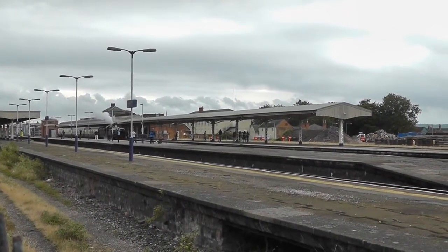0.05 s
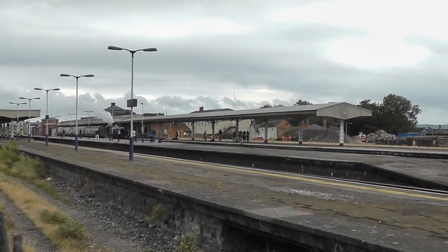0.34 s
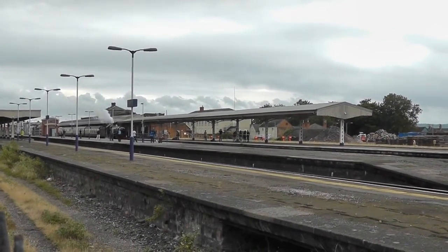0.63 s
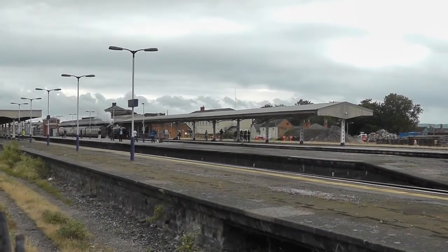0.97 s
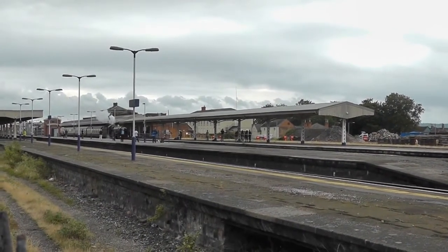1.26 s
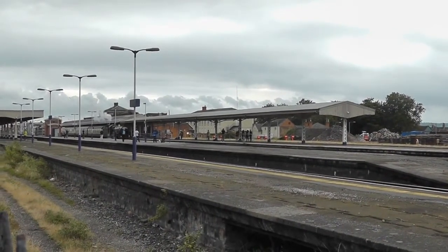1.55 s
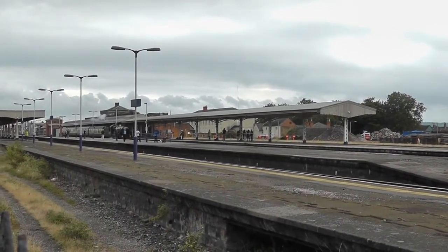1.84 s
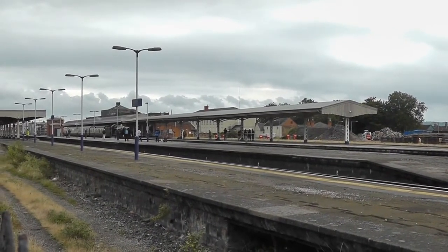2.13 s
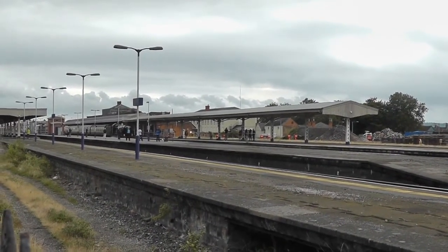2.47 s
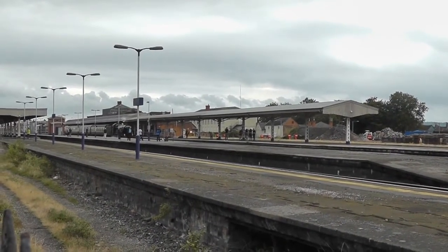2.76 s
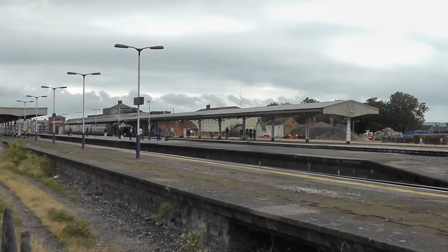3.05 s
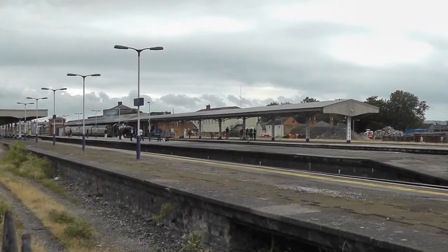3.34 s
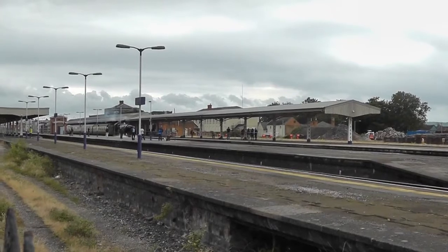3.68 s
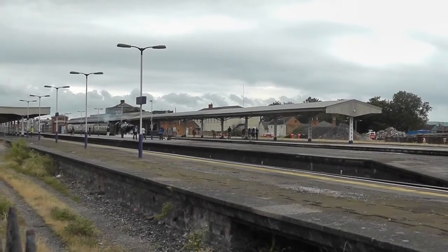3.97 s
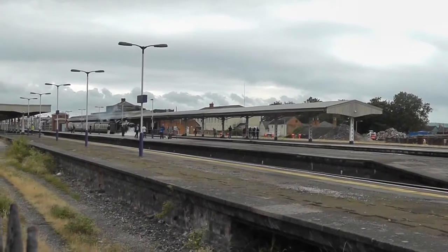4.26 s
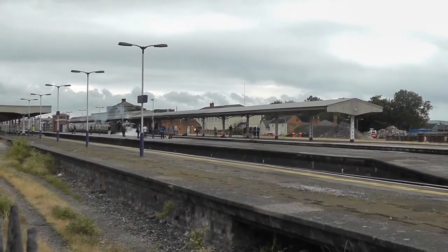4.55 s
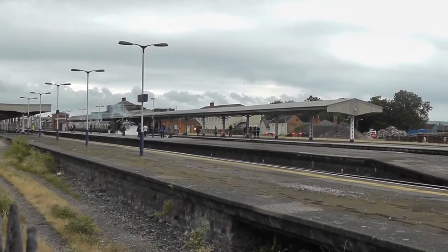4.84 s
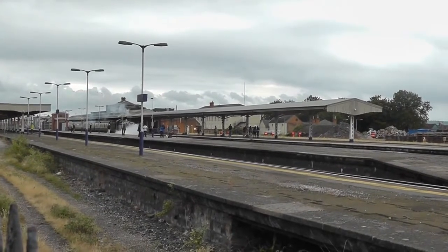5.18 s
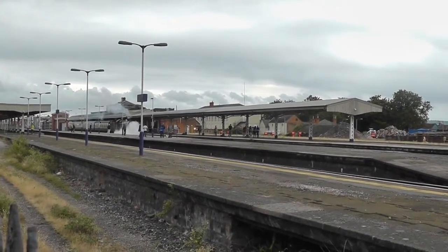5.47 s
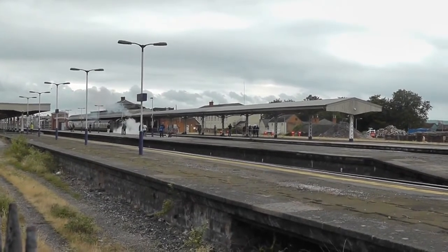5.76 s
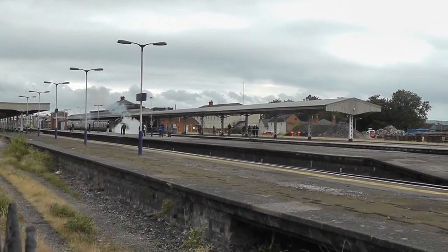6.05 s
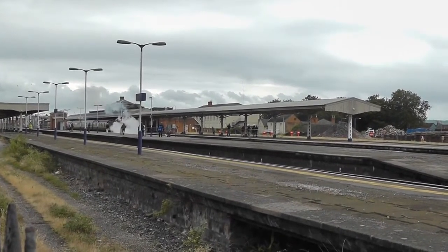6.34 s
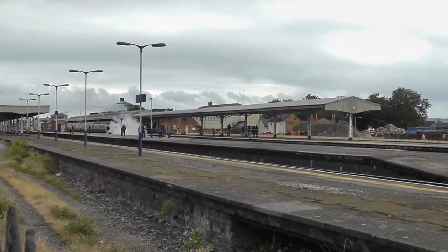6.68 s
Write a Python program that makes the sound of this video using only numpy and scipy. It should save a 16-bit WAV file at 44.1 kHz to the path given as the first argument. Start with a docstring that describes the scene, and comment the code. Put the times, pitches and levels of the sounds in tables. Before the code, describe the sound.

Heard from an open railway platform, a distant steam whistle holds one slightly raspy note, breaks off and adds a quick toot, leaving a long echo. Low wind rumble rises on the microphone, with a few hard knocks around the middle. Meanwhile the locomotive starts to vent steam, a faint leak at first, then a bright hiss that grows in swells above the engine's soft, dull roar.

```python
"""A steam locomotive's whistle, heard from far down a station platform: a long blast, a short toot.
A steam jet drives the pipe, which scoops up to its note and turns brighter when overblown.
The buildings ring on and distant walls answer; then the cylinder drains open in a growing hiss
over a dull roar. Wind buffets the microphone of a small camera, whose limiter ducks under the
strongest gusts."""
import sys
import numpy as np
from scipy import signal
from scipy.fft import rfft, irfft, next_fast_len
from scipy.io import wavfile
from scipy.ndimage import uniform_filter1d

SR = 44100
rng = np.random.default_rng(int(sys.argv[2]) if len(sys.argv) > 2 else 0)


def pcm_store(signal):
    """Save signal as 16-bit PCM."""
    levels = np.round(np.clip(np.atleast_2d(signal), -1, 1) * 32767)
    wavfile.write(sys.argv[1], SR, levels.astype(np.int16).T)


N = 300321
LEAD = 3 * SR // 2  # the whistle is already sounding when the scene begins
T = np.arange(-LEAD, N) / SR
NOTE_HZ = 884
MID_BAND_HZ = (1000, 1600)  # sets the level of roar and rush

# pulls of the whistle cord: valve opens t/s, valve shut t/s
PULLS = [(-1.5, 1.372), (1.524, 1.719)]


def amp(db):
    """Decibels to gain."""
    return 10 ** (np.asarray(db) / 20)


def unit(x):
    """Scales to rms 1."""
    return x / np.sqrt(np.mean(x ** 2) + 1e-20)


def follow(rows):
    """The columns of a time curve, one value a sample."""
    times, *columns = np.transpose(rows)
    return [np.interp(T, times, column) for column in columns]


def at_hz(rows, hz, column=1):
    """One column of a spectrum at the given frequencies."""
    table = np.transpose(rows)
    return np.interp(np.log(hz + 1), np.log(table[0] + 1), table[column])


def swells(rows):
    """Bell-shaped rises and dips in dB, one for each row."""
    return sum(db * np.exp(-((T - s) / half_s) ** 2) for s, half_s, db in rows)


def wobble(rate_hz):
    """Smooth random motion of rms 1, mostly slower than the given rate."""
    size = next_fast_len(len(T))
    hz = np.fft.rfftfreq(size, 1 / SR)
    spectrum = rfft(rng.standard_normal(size)) / (1 + (hz / rate_hz) ** 2)
    return unit(irfft(spectrum, size)[:len(T)])


def noise(spectrum, band_hz, patchy_db):
    """Coloured noise with drifting patches, rms about 1 inside the band."""
    hz = np.fft.rfftfreq(2048, 1 / SR)
    real, imag, patches = rng.standard_normal((3, len(T) // 512 + 3, len(hz)))
    patches = unit(uniform_filter1d(uniform_filter1d(patches, size=9, axis=0), size=30, axis=1))
    colour = amp(at_hz(spectrum, hz))
    band_share = np.sum(colour[(hz > band_hz[0]) & (hz < band_hz[1])] ** 2) / np.sum(colour ** 2)
    frames = (real + 1j * imag) * colour * amp(patchy_db * patches)
    sound = signal.istft(frames.T, nperseg=2048, noverlap=1536)[1][:len(T)]
    return unit(sound) / np.sqrt(band_share)


def resonate(x, hz, width_hz):
    """A resonance of gain 1 that follows the curve hz."""
    turn = np.exp(2j * np.pi * np.cumsum(hz) / SR)
    pole = np.exp(-np.pi * width_hz / SR)
    return 2 * (turn * signal.lfilter([1 - pole], [1, -pole], x / turn)).real


def roar():
    """The dull roar of the distant engine: the low body of its steam, blurred by the yard."""
    # colour of the roar: f/Hz, level/dB
    colour = [(150, -17), (350, -3.5), (550, 1.5), (850, -4), (1150, 5), (1600, 2), (2300, -0.5),
              (4000, -31.5), (12000, -62)]
    # its slow rise: t/s, level/dB
    rise = [(1.78, -49), (2.25, -44), (3.05, -37.5), (3.3, -44.5), (3.95, -40), (4.3, -39), (5.1, -39),
            (6.1, -33), (6.81, -32.5)]
    return amp(follow(rise)[0]) * noise(colour, MID_BAND_HZ, patchy_db=1.4)


def wind(eddy_db=-3, lumpy_db=3, unsteady_db=3.0, eddy_share=0.59):
    """Slow pressure swings on the microphone, with lumps of smaller eddies; gusts lift both."""
    # colours of the slow swings and the fast eddies: f/Hz, level/dB
    swing_colour = [(10, -33.5), (20, -0.5), (43, 0), (79, -1.5), (115, -14.5), (200, -30), (420, -41),
                    (900, -75.5)]
    eddy_colour = [(50, -27), (110, 4.5), (160, -1), (250, -12), (400, -25), (800, -34), (2000, -59.5),
                   (8000, -100)]
    # breeze along the platform: t/s, swing level/dB, eddy level/dB
    breeze = [(0, -31, -49), (.45, -39.5, -48.5), (1.1, -33.5, -43), (1.38, -20, -32.5), (1.68, -41, -53),
              (1.85, -28, -39.5), (2.3, -15.5, -30), (3.1, -7.5, -22), (3.7, -10, -22.5), (5.0, -12, -22.5),
              (6.0, -22.5, -30), (6.45, -20, -32), (6.81, -7, -32)]
    # gusts and lulls on top of it: middle t/s, half length/s, change/dB
    gusts = [(2.39, 0.028, 7.5), (2.75, 0.037, 5), (2.9, 0.068, -12.5), (3.12, 0.02, 0), (3.58, 0.15, 4.5),
             (5.75, 0.3, 3), (6.25, 0.087, 11)]
    swing_level, eddy_level = follow(breeze)
    gust_db = swells(gusts) + unsteady_db * wobble(1.3)
    swings = noise(swing_colour, band_hz=(20, 130), patchy_db=2.5)
    swings /= np.sqrt(uniform_filter1d(swings ** 2, size=6000))  # breeze and gusts set the strength
    eddies = noise(eddy_colour, band_hz=(130, 350), patchy_db=1.5) * unit(amp(lumpy_db * wobble(16.0)))
    return amp(swing_level + gust_db) * swings + amp(eddy_level + eddy_share * gust_db + eddy_db) * eddies


def buffets(swing_s=0.0037):
    """Hard knocks of wind on the microphone, each a rounded push of pressure and a pull back."""
    # single buffets: t/s, peak level/dB
    knocks = [(3.09, 0), (3.237, -.5), (3.407, .5), (3.706, 3.5), (4.129, 4)]
    pressure = np.zeros(len(T))
    for s, db in knocks:
        offset = (T - s) / swing_s
        swing = -offset * np.exp(-offset ** 2)
        pressure += amp(db) * swing / swing.max()
    return pressure


def cylinder_drains(hiss_db=-1, fizz_db=-1.5, split_hz=4900, jet_width_hz=560, fizz_share=0.58):
    """Steam escapes in a sputtering hiss, a fine fizz above it, and a broad moving resonance."""
    # colour of the escaping steam: f/Hz, level/dB
    colour = [(500, -16.5), (900, -17), (1170, -23.5), (1430, -15), (1650, -6), (1900, -8.5), (2800, -2.5),
              (3600, 0), (5000, -11), (6600, -11.5), (9200, -18), (12100, -30), (15400, -50.5)]
    # a leak, then the drains open and the flow builds: t/s, hiss level/dB, fizz level/dB
    flow = [(1.75, -41.5, -50.5), (2.65, -41.5, -43), (3.73, -37, -44), (3.79, -31.5, -36), (4.3, -26, -37),
            (5.15, -26, -36), (5.9, -23, -32), (6.6, -20.5, -30), (6.81, -24, -35)]
    # swells of the hiss, and brief dips where the sound ducks under wind gusts:
    # middle t/s, half length/s, change/dB
    swells_and_dips = [(2.64, 0.11, 6.5), (2.82, 0.059, -5), (2.98, 0.098, 4), (3.87, 0.09, 6.5),
                       (4.08, .04, 0.5), (4.55, 0.058, 0.5), (5.52, 0.16, 5), (5.79, 0.062, 4),
                       (6.19, 0.18, 4), (6.32, 0.094, -5.5), (6.55, 0.084, -0.5)]
    # the jet's ringing centre, moving as the cloud spreads: t/s, f/Hz, level against the hiss/dB
    jet_centre = [(3.85, 3570, -1), (4.3, 3630, -34), (4.55, 2440, -12.5), (5.45, 2270, -6),
                  (5.8, 2870, -4), (6.2, 3360, -11), (6.8, 3180, -22)]
    hiss_level, fizz_level = follow(flow)
    change_db = swells(swells_and_dips)
    jet_hz, jet_db = follow(jet_centre)
    low_pass = signal.butter(5, split_hz, fs=SR, output="sos")
    high_pass = signal.butter(5, split_hz, "high", fs=SR, output="sos")
    hiss = signal.sosfilt(low_pass, noise(colour, band_hz=(2500, 4500), patchy_db=1.5))
    fizz = signal.sosfilt(high_pass, noise(colour, band_hz=(5500, 11000), patchy_db=2.3))
    jet = resonate(rng.standard_normal(len(T)), jet_hz, jet_width_hz)
    jet = unit(resonate(jet, jet_hz, jet_width_hz))
    steam = amp(hiss_level + change_db + hiss_db) * (hiss + amp(jet_db) * jet)
    steam += amp(fizz_level + fizz_share * change_db + fizz_db) * fizz
    sputter_db = 0.63 * wobble(41) + 0.34 * wobble(21)
    return steam * amp(sputter_db)


def station(x, build_s=0.022, echo_cut_hz=1300, smear_s=0.034):
    """Canopies and walls scatter a long tail; far walls send back late, dull, smeared echoes."""
    # ring of the buildings: f/Hz, level/dB, t60/s
    ring = [(300, -27, 1.8), (810, -7, 3.27), (1760, -6.5, 2.7), (2620, -11.5, 1.83), (3600, -11, 1.4),
            (5900, -15, 2.2), (12000, -37.5, .4)]
    # answers from the far walls: delay t/s, level/dB
    far_walls = [(1.022, -21.5), (1.332, -25.5)]
    t = np.arange(3 * SR) / SR
    hz, age_s, frames = signal.stft(rng.standard_normal(len(t)), SR, nperseg=512)
    t60 = at_hz(ring, hz, column=2)[:, None]
    equal_energy = np.sqrt(2 * np.log(1000) / (t60 * SR))
    frames *= amp(at_hz(ring, hz)[:, None] - 60 * age_s / t60) * equal_energy
    tail = signal.istft(frames, SR, nperseg=512)[1][:len(t)] * np.minimum(t / build_s, 1)
    arrivals = sum(amp(db) * (t > delay) * np.exp(-abs(t - delay) / smear_s) for delay, db in far_walls)
    echoes = rng.standard_normal(len(t)) * arrivals * np.sqrt(2 / (smear_s * SR))
    echoes = signal.lfilter(*signal.butter(2, echo_cut_hz, fs=SR), echoes)
    return signal.fftconvolve(x, tail + echoes)[:len(T)]


def whistle_valve(travel_s=.036, sag=.11, settle_s=.021):
    """The valve's opening (0-1) and the note, which scoops up as it opens and sags as it shuts."""
    inside_s = sum(np.maximum(np.minimum(T - opens, shut - T), 0) for opens, shut in PULLS)
    return np.minimum(inside_s / travel_s, 1), NOTE_HZ * (1 - sag * np.exp(-inside_s / settle_s))


def lip_rush(valve, hz, blow, level_db=-3.5, pipe_db=-1, sputter_db=1, spit_db=3.0, spit_s=0.026):
    """Steam tears over the whistle's lip, spits as the valve opens and rings the pipe's resonances."""
    # colour of the steam at the lip: f/Hz, level/dB
    colour = [(200, -45), (430, -11.5), (600, -3), (780, 8.5), (1050, -3), (1450, 3), (2300, -3.5),
              (3700, -1), (4600, -10.5), (6500, -16.5), (9000, -23), (12000, -36), (15500, -48)]
    spit = swells([(opens + spit_s, spit_s / 2, spit_db) for opens, shut in PULLS])
    rush = noise(colour, MID_BAND_HZ, patchy_db=2.0) * blow * valve ** 2
    rush *= amp(spit + sputter_db * wobble(21))
    pipe = sum(resonate(rush, k * hz, width_hz=70) for k in range(1, 5))
    return amp(level_db) * (rush + amp(pipe_db) * pipe)


def whistle(valve, hz, blow, overblow_db, bright_db, rasp_rad=.18, flicker_db=3.5, flutter=0.063):
    """An unsteady steam jet drives one pipe; the overtones speak only once the valve is wide open."""
    # partials 1 and 2: level/dB, change per dB of overblowing/dB
    low_partials = [(-7.5, -0.48), (-23, 0.1)]
    # partials 3 and 4: level against bright_db/dB, change per dB of overblowing/dB
    mid_partials = [(1, -0.85), (-6, 0.46)]
    # higher partials: f/Hz, level against bright_db/dB
    overtones = [(4400, -22.5), (5300, -24.5), (6200, -26.5), (7100, -34.5), (8000, -36.5), (9800, -42.5),
                 (13000, -65)]
    levels = [db + slope * overblow_db for db, slope in low_partials]
    levels += [bright_db + db + slope * overblow_db for db, slope in mid_partials]
    levels += [bright_db + 0.59 * overblow_db + at_hz(overtones, k * NOTE_HZ) for k in range(5, 15)]
    turbulence = np.sqrt(unit(blow))  # harder blowing shakes the jet more
    wander = .0032 * wobble(12.1)
    jitter = turbulence * (0.00421 * wobble(33.5) + 0.00733 * wobble(390))
    phase = 2 * np.pi * np.cumsum(hz * (1 + wander + jitter)) / SR
    tone = amp(levels[0]) * np.sin(phase) * np.sqrt(valve)
    for k, db in enumerate(levels[1:], start=2):
        fray = rasp_rad * np.sqrt(k / 2) * turbulence * wobble(120)
        tone += amp(db + flicker_db * wobble(11.7)) * np.sin(k * phase + fray) * valve ** 3
    return tone * (1 + flutter * turbulence * wobble(61))


def scene(overblown_above_db=-33, rush_ring_db=-4):
    """From the platform, in mono: the far whistle and its ring, the engine's steam, the wind close by."""
    # how hard the blast and the toot are blown: t/s, rush level/dB, upper overtone level/dB
    blast = [(0, -32.5, -15), (.15, -32.5, -17), (.42, -35, -25), (.66, -32.5, -14), (.8, -35.5, -16),
             (.9, -30, -25), (1.04, -27.5, -13), (1.17, -28, -13.5), (1.33, -28, -14.5)]
    toot = [(1.56, -25.5, -14), (1.574, -32.5, -13.5), (1.69, -34, -17.5)]
    blow_db, bright_db = follow(np.vstack([blast, toot]))
    blow = amp(blow_db)
    overblow_db = np.maximum(blow_db - overblown_above_db, 0)  # moves power up from the fundamental
    valve, hz = whistle_valve()
    tone = whistle(valve, hz, blow, overblow_db, bright_db)
    rush = lip_rush(valve, hz, blow)
    ring = station(tone + amp(rush_ring_db) * rush)
    return (tone + rush + ring + cylinder_drains() + roar() + wind() + buffets())[None, LEAD:]


def record(dry, bass_cut_hz=14, top_cut_hz=15450, ceiling_db=-3, recovery_db_per_s=45):
    """The camera: its microphone's bass cut, a limiter that ducks fast and recovers slowly, a top cut."""
    heard = signal.sosfilt(signal.butter(2, bass_cut_hz, "high", fs=SR, output="sos"), dry)
    over_db = np.maximum(20 * np.log10(abs(heard[0]) + 1e-9) - ceiling_db, 0)
    recovery_db = np.arange(N) / SR * recovery_db_per_s
    duck_db = uniform_filter1d(np.maximum.accumulate(over_db + recovery_db) - recovery_db, size=16)
    low_pass = signal.firwin(511, top_cut_hz, window=("kaiser", 9), fs=SR)
    return signal.oaconvolve(heard * amp(-duck_db), low_pass[None], "same")


dry = scene()
out = record(dry)
pcm_store(out)
```